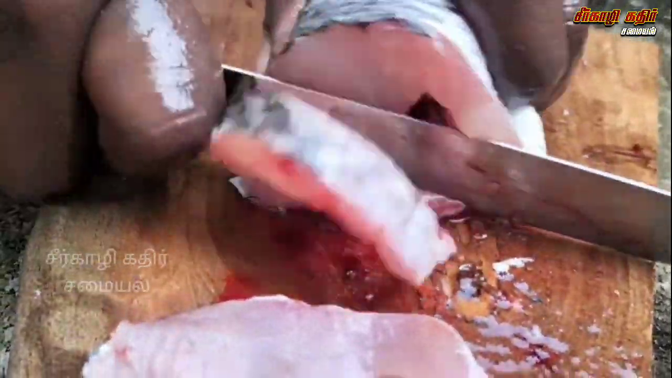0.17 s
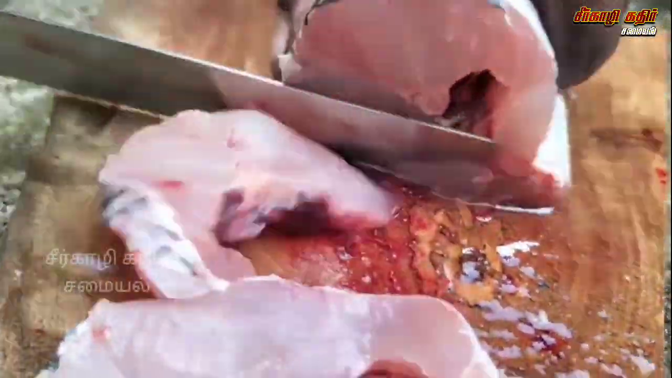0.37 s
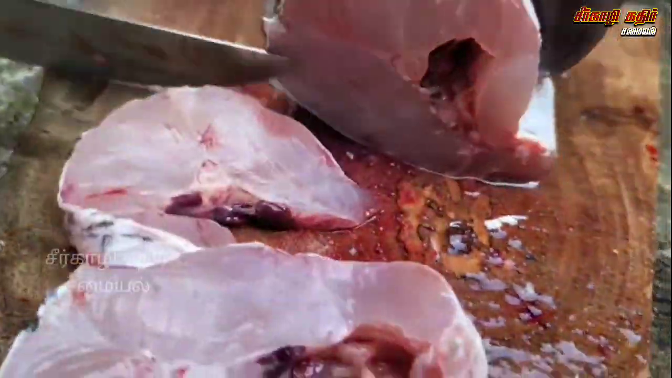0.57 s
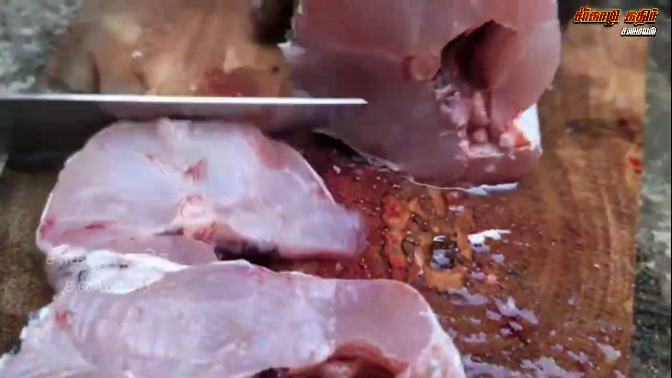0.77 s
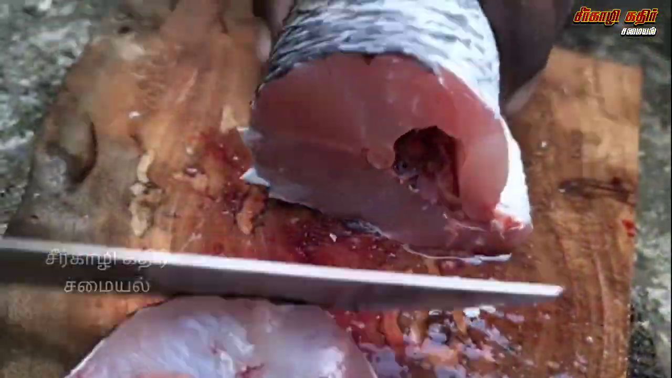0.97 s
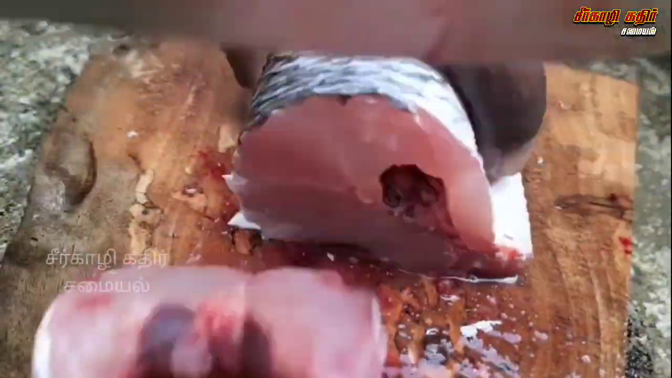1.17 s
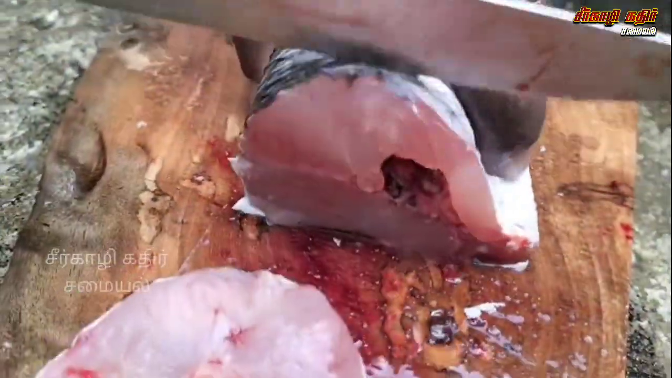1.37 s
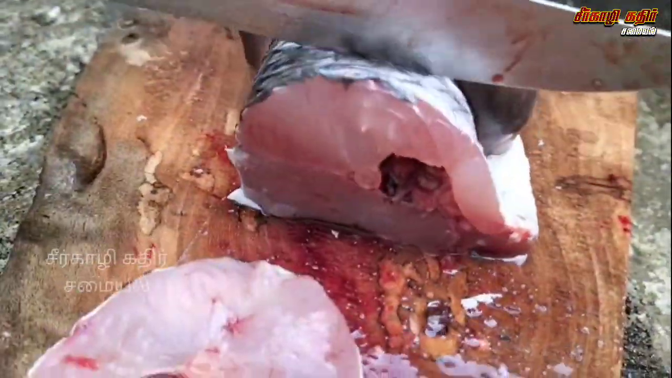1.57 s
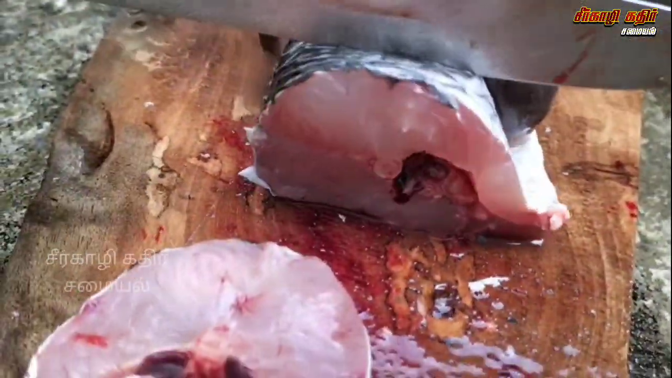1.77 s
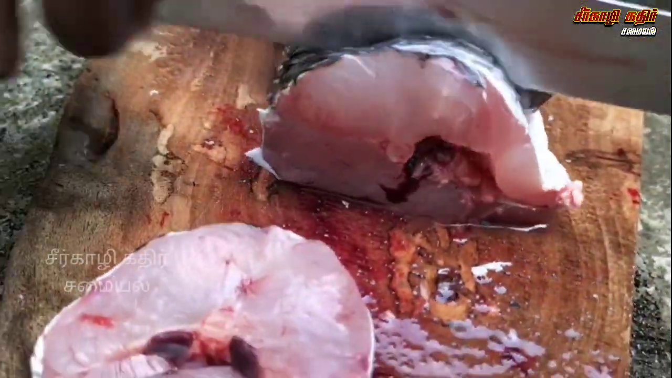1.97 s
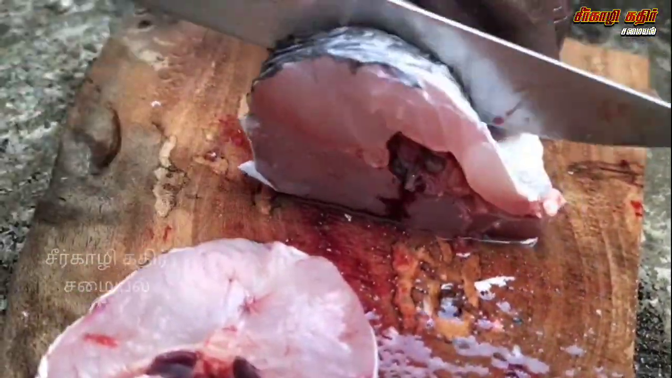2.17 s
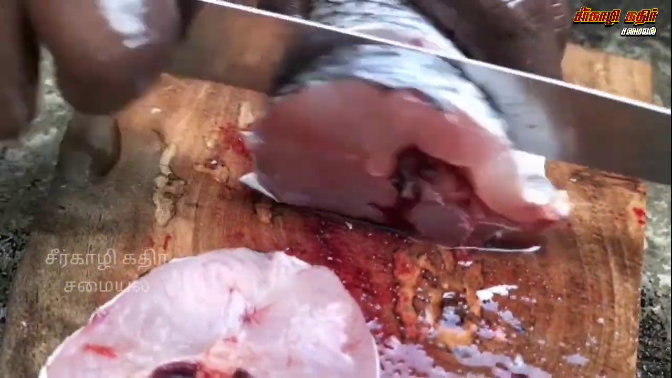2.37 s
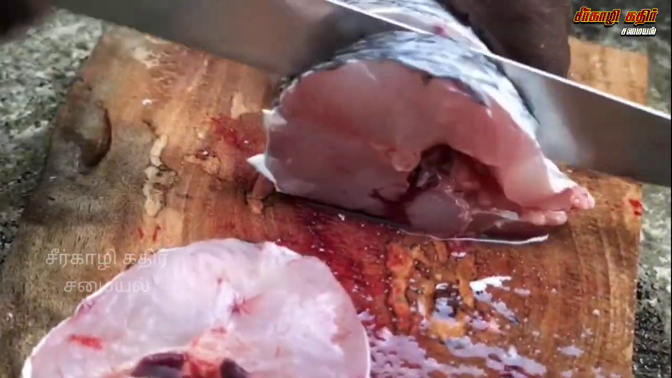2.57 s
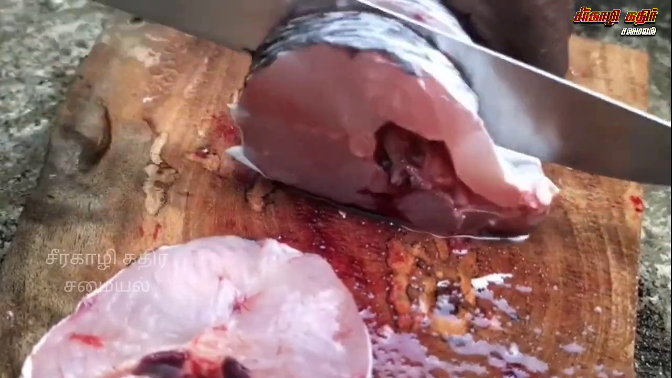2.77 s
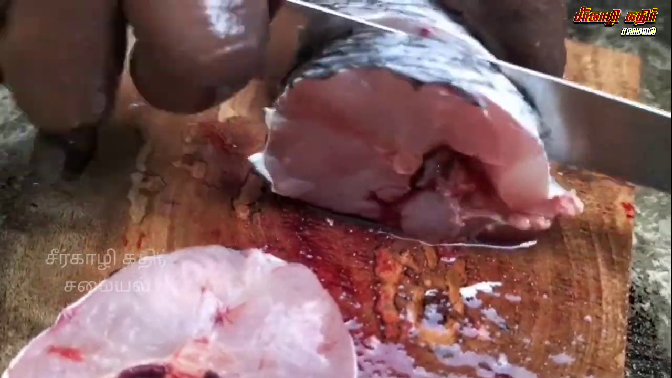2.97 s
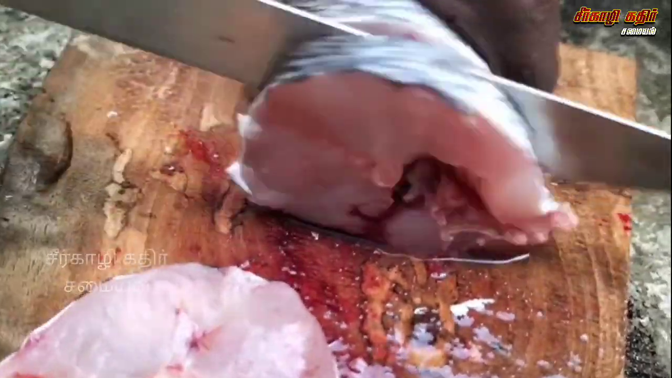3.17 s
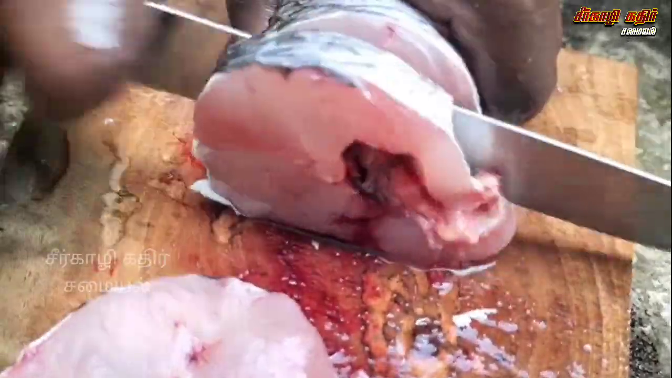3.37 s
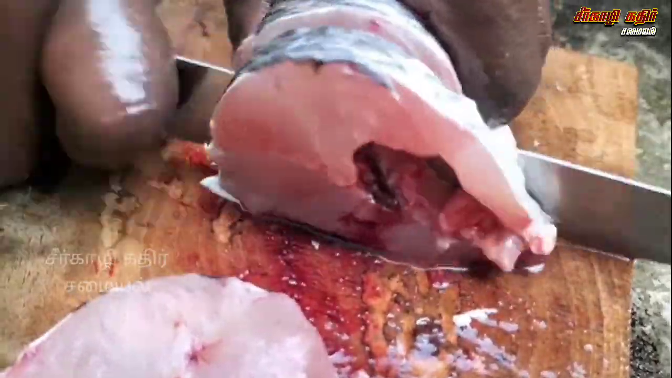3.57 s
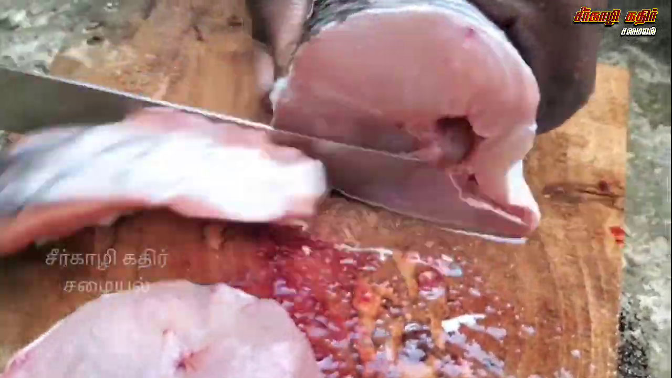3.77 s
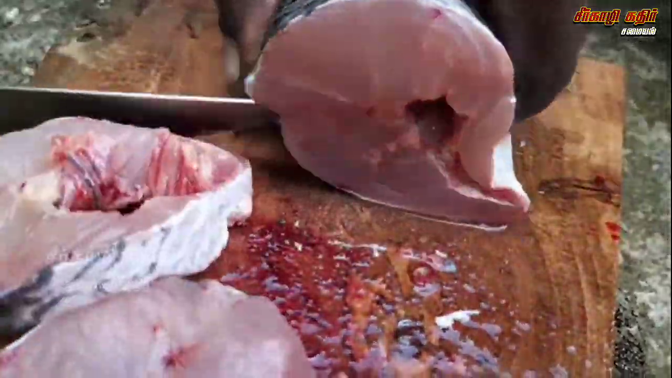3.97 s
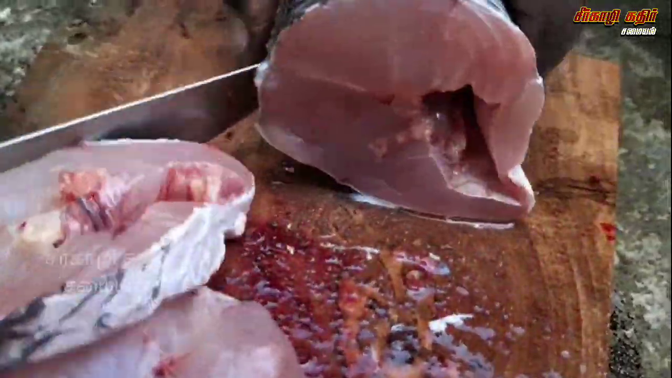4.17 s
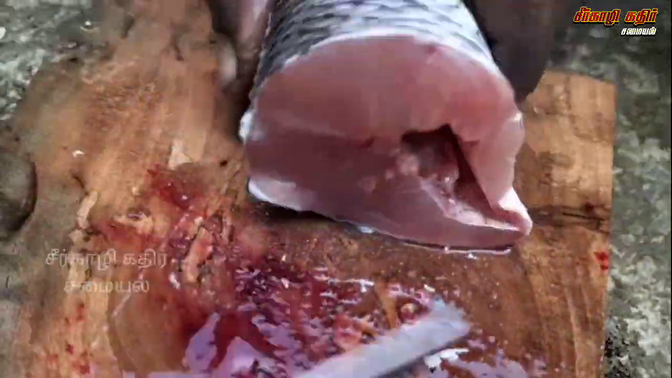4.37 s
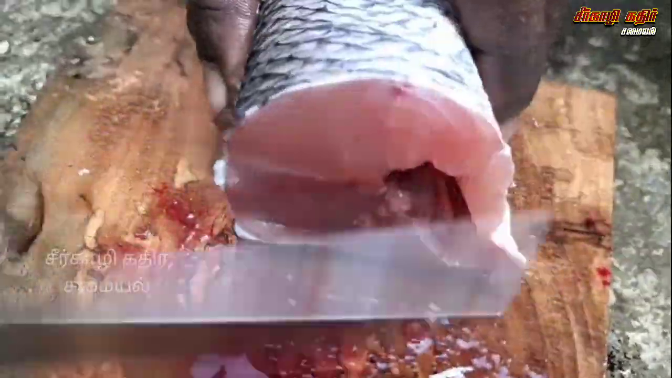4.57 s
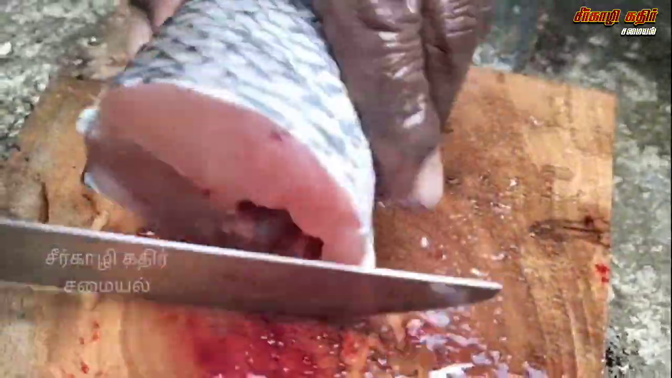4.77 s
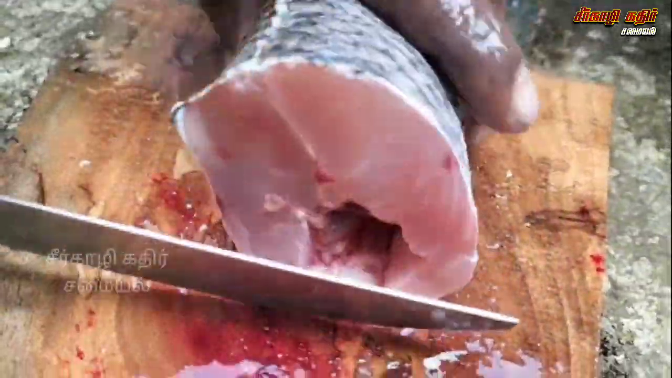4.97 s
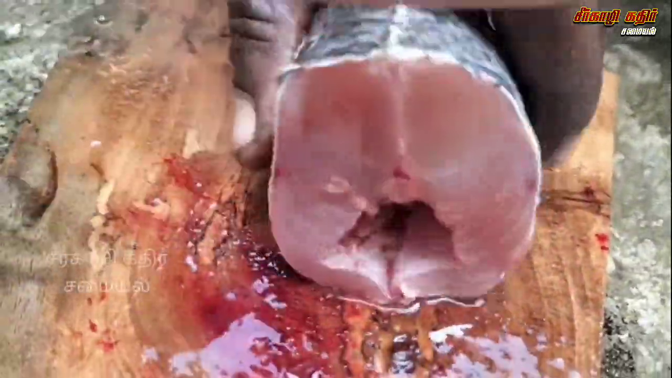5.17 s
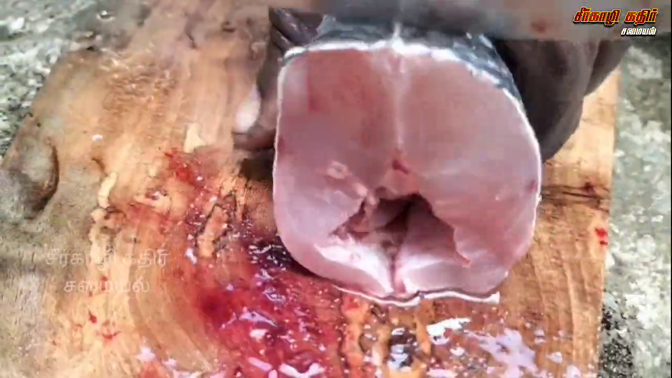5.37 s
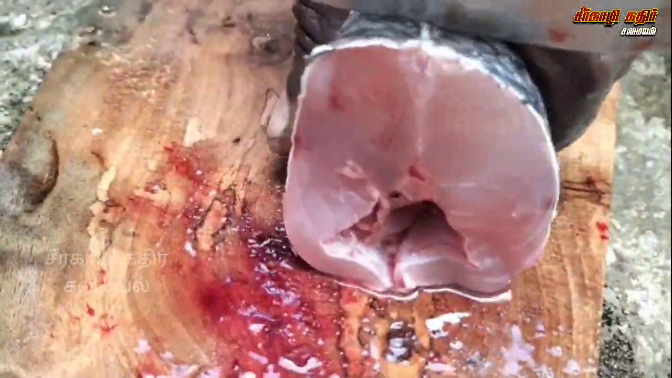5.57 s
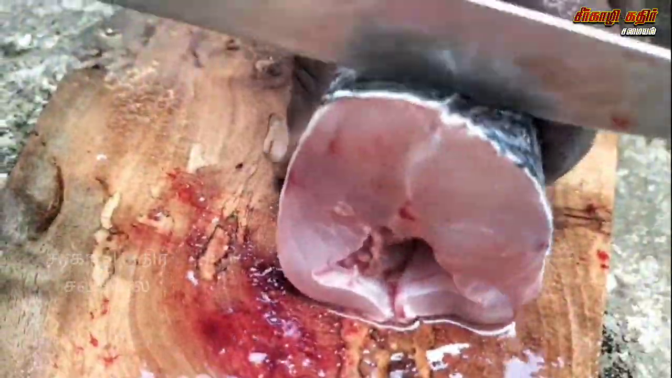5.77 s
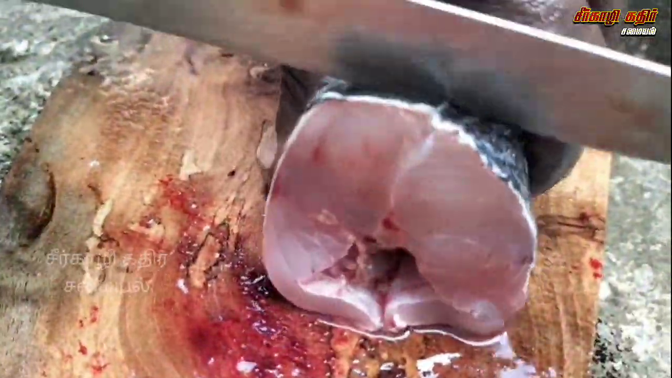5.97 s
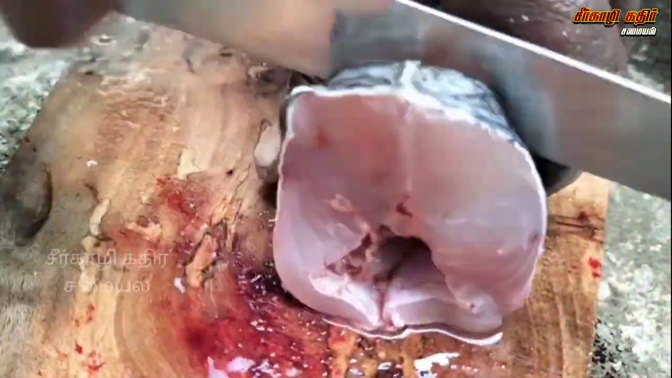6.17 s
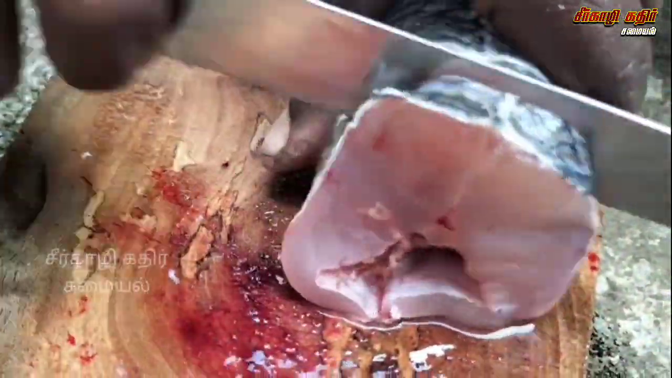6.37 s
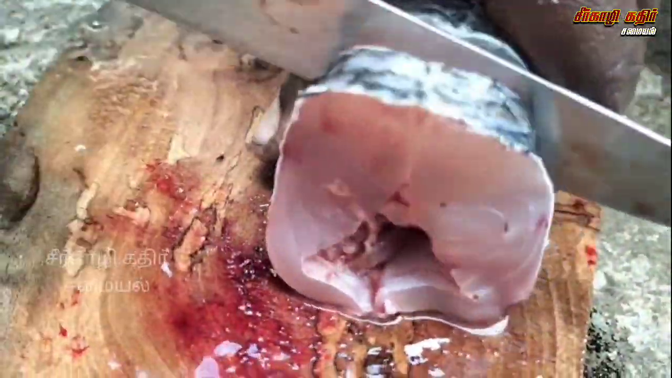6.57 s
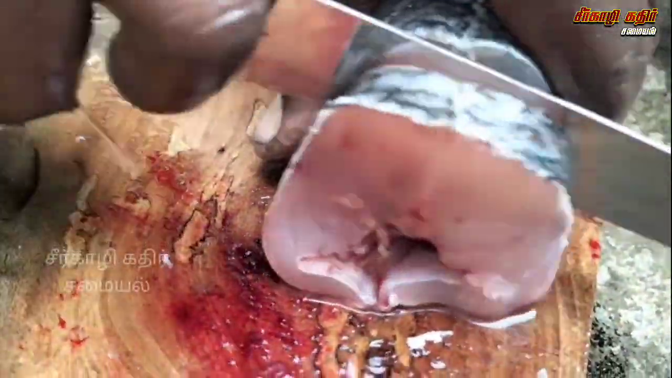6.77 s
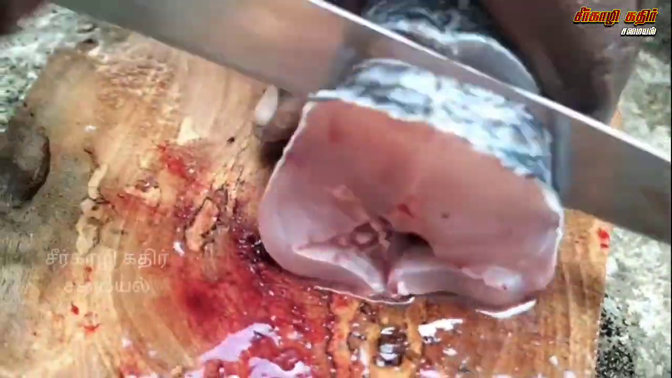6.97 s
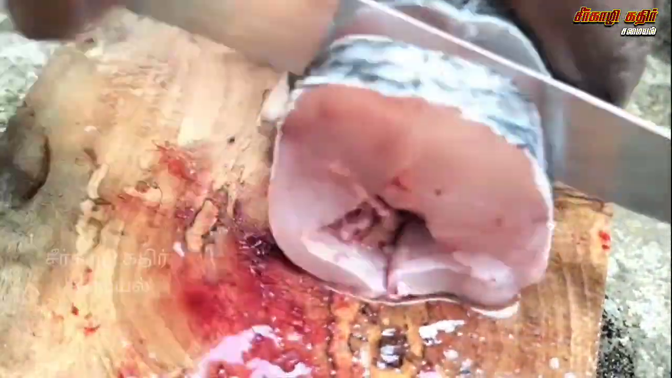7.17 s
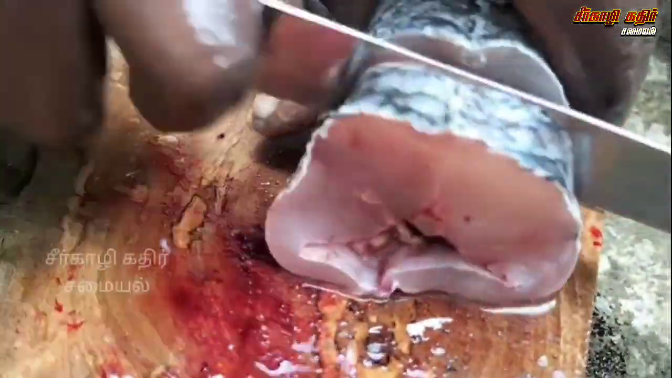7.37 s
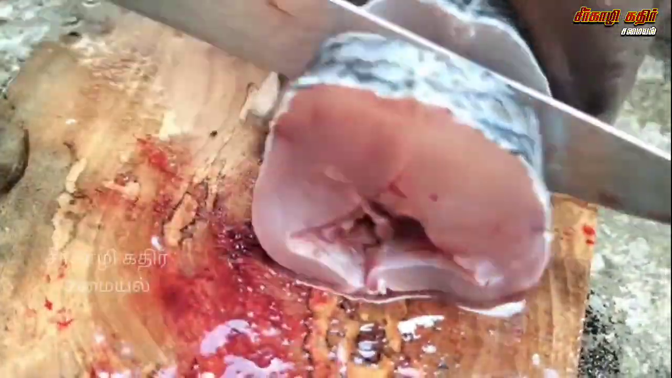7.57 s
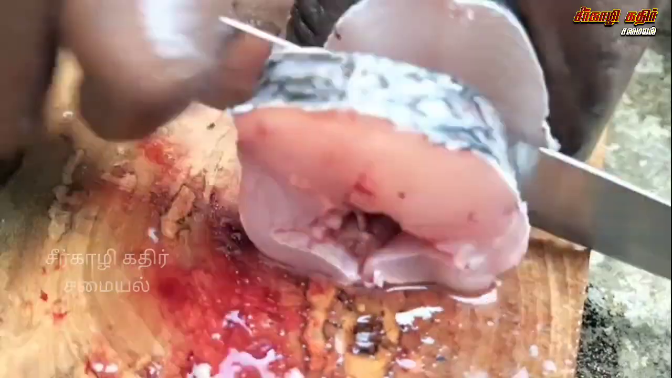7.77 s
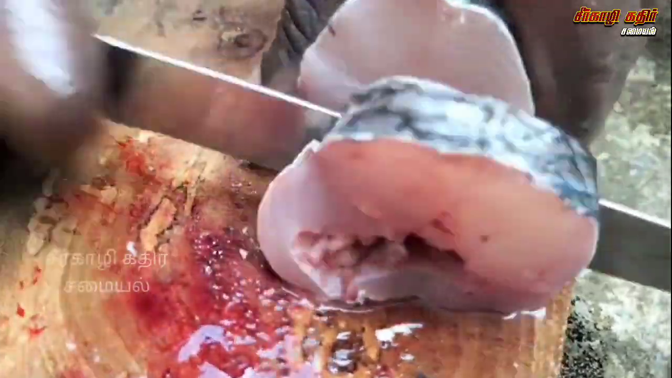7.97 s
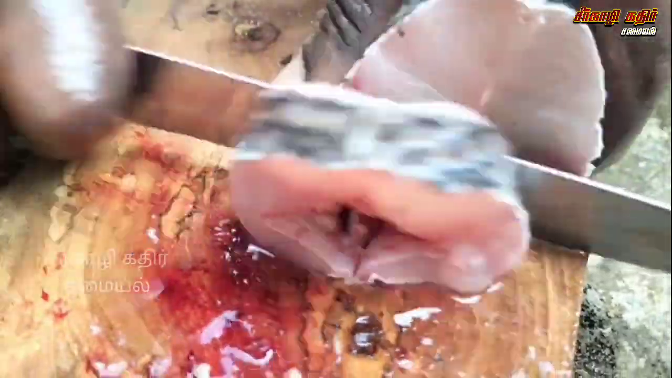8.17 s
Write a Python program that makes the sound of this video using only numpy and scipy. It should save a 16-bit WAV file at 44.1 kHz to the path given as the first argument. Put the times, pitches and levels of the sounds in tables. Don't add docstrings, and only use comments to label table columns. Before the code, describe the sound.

Outdoors, very close: wet slides and cracks on a chopping board, then about a second of faint hum and air. A knife saws in short back-and-forth rasps, growing harsher as bone cracks, while an insect buzzes faintly. Slippery squeaks and dull pushes lead to one sharp wooden knock with a short echo, then a duller tap. Quiet returns before hissing, lighter sawing resumes to the end.

```python
import sys
import numpy as np
from scipy import signal
from scipy.fft import rfft, irfft
from scipy.io import wavfile
from scipy.ndimage import uniform_filter1d, map_coordinates

SR = 44100
rng = np.random.default_rng(int(sys.argv[2]) if len(sys.argv) > 2 else 0)


def log_audio(samples):
    frames = np.atleast_2d(samples).T
    limited = np.clip(frames, -1, 1)
    pcm = np.round(limited * 32767).astype(np.int16)
    wavfile.write(sys.argv[1], SR, pcm)


def to_linear_factor(level_db):
    exponent = np.asarray(level_db, float) / 20
    return 10 ** exponent


N = 362042
T = np.arange(N) / SR

# (time [s], length [s], edge hiss [dB], flesh rasp [dB], scale rasp [dB])
SAW_FIRST = [(2.025, 0.12, -58.5, -65.5, -71), (2.191, 0.12, -65.5, -61, -68.5),
             (2.347, 0.09, -57.5, -50.5, -62.5), (2.517, 0.093, -56.5, -53, -62),
             (2.667, 0.1, -56.5, -48.5, -67.5), (2.845, 0.089, -65.5, -51.5, -57),
             (2.987, 0.088, -56.5, -51.5, -60), (3.15, 0.092, -56.5, -53, -59)]
SAW_LAST = [ (6.135, 0.076, -56.5, -64, -64), (6.292, 0.103, -63.5, -82.5, -81),
            (6.451, 0.1, -66, -64, -67), (6.625, 0.08, -57, -68, -75), (6.775, 0.11, -60.5, -57, -67),
            (6.957, 0.088, -53.5, -56, -71.5), (7.104, 0.11, -58.5, -57, -63),
            (7.283, 0.08, -49, -59, -66.5), (7.425, 0.11, -54, -57.5, -64.5),
            (7.61, 0.083, -50.5, -59.5, -68), (7.764, 0.089, -51.5, -50.5, -54.5),
            (7.899, 0.12, -63, -59, -57), (8.071, 0.098, -59.5, -59, -60)]
SAW_BONE = [
    (3.295, 0.13, -51, -48, -60),
    (3.46, 0.13, -51.5, -56.5, -64),
    (3.615, 0.084, -52, -48, -56.5),
]
SAW_THROUGH = [
    (3.74, .06, -66, -60, -66),
    (3.79, .115, -47, -45, -51),
    (3.9, 0.07, -68.5, -61, -69),
]
BRUSHES = [
    (4.605, .02, -84, -95, -95),
    (4.83, 0.028, -76, -93, -95),
    (4.905, 0.045, -66.5, -68, -80),
    (6.02, 0.12, -80, -78.5, -89),
]
DULL_FIRST_DB = [.2, -3, .1, -2, 3, .1, .1, -1.5]
DULL_LAST_DB = [.1, .1, .1, 3, -2, 3, -2, .1, .1, .1, .1, .1, .1]

# (time [s], hold [s], edge glide [dB], flesh drag [dB], weight on board [dB])
SHOVE_FIRST = [
    (0, 0.024, -55.5, -48.5, -48.5),
    (.125, .035, -60, -53, -62),
    (.18, 0.021, -51, -38.5, -43.5),
    (.39, 0.057, -54, -39.5, -52),
    (.45, .07, -59, -41, -58),
    (.52, 0.041, -62, -48, -55.5),
]
SHOVE_SECOND = [
    (4.18, .02, -70, -58, -66),
    (4.22, 0.055, -60.5, -50, -56),
    (4.26, 0.05, -62, -55, -51),
    (4.36, 0.027, -66, -60, -50),
    (4.45, .02, -67, -64, -48),
    (4.485, 0.061, -60.5, -61.5, -49),
]
SLIDE = [
    (.575, 0.039, -65, -55, -49),
    (.63, 0.078, -75.5, -52, -52),
    (.71, 0.13, -79, -57.5, -51.5),
]
SCRAPE = [
    (.885, .02, -54, -43, -50),
    (.92, 0.057, -63.5, -57.5, -58.5),
    (1.0, 0.055, -73.5, -71, -74),
]

# (low edge [Hz], high edge [Hz])
RASP_BANDS_HZ = [(7300, 16000), (1100, 3300), (3300, 7300), (350, 1100)]
# (frequency [Hz], density [dB per Hz])
COLOUR_SAW_FIRST = [(897, -17), (1600, -0.5), (2200, -12), (3480, -22), (6920, -42), (8380, -15.5),
                    (10500, -16), (15900, -45)]
COLOUR_SAW_LAST = [(500, 4.5), (897, -8.5), (1750, 8), (2500, -18), (6810, -41.5), (8250, -12.5),
                   (10600, -8.5), (15900, -25)]
COLOUR_BONE = [(210, -41.5), (350, -15), (1670, -16), (2230, -14), (3660, -4), (6600, -21.5),
               (10500, -13.5), (15900, -38)]
COLOUR_SHOVE_FIRST = [(300, -24.5), (547, -6), (1450, -12.5), (2380, -6.5), (4640, -19), (8000, -11),
                      (9500, -26), (15900, -21)]
COLOUR_SHOVE_SECOND = [(400, -5), (700, -25), (2400, -23), (3300, -12.5), (4300, -11), (4700, -30),
                       (11200, -18), (15900, -62)]
# (frequency [Hz], width [Hz], level [dB])
RINGS_SAW_FIRST = [(1750, 77, -21), (2670, 170, 3)]
RINGS_SAW_LAST = [(1490, 235, 8.5), (2595, 35, 2.5), (3870, 100, -12.5), (10870, 110, -4)]
RINGS_BONE = [(1730, 220, -4.5), (2600, 91, -2.5), (3730, 243, -14), (8590, 165.3, -9)]
RINGS_SHOVE_FIRST = [(1215, 55, -7), (1782, 56, -1), (2350, 83, -5.5), (5400, 700, -10), (6500, 700, -10)]
RINGS_SHOVE_SECOND = [(655, 110, -2.5), (1210, 96, -16.5)]
RINGS_SLIDE = [(958, 55, -8), (1870, 57, -4.5), (2394, 81, -5.5), (3430, 93, -20), (4740, 580, -15.5)]
RINGS_SCRAPE = [(880, 480, 9), (3840, 380, -7), (8260, 540, -16)]

# (time [s], peak [dB], ring [Hz], bright tick [dB])
SNAPS = [(0.0298, -31, 6500, -50), (.1266, -37, 2930, -45), (.1341, -36, 2610, -60),
         (0.1635, -20, 2340, -40), (.164, -30, 5400, -50), (.192, -30, 5600, -40), (.368, -35, 1750, -60),
         (0.184, -31, 820, -33), (0.197, -29, 1750, -38), (0.415, -26, 1810, -45), (0.586, -32, 756, -60),
         (1.143, -44, 1530, -41), (1.173, -52, 3500, -63), (2.072, -43.5, 2620, -33.5),
         (2.103, -49.5, 1630, -36), (2.259, -44, 2630, -60), (2.268, -42, 3100, -60),
         (2.373, -38, 2600, -42), (2.428, -45, 1640, -60), (2.524, -45, 2600, -60), (2.535, -44, 1700, -60),
         (2.566, -45, 2660, -60), (2.693, -45, 1630, -60), (2.7265, -45, 1520, -60),
         (2.8986, -44, 2670, -60), (3.016, -45, 2660, -60), (3.028, -45, 2680, -60), (3.2, -45, 2670, -60),
         (3.302, -42, 1440, -60), (2.849, -40, 2700, -42), (2.869, -46, 2600, -58), (3.159, -41, 2730, -60),
         (3.33, -29, 2870, -29), (3.34, -31, 2900, -32), (3.375, -26, 3060, -25), (3.3755, -40, 600, -60),
         (3.519, -42, 1740, -42), (3.409, -45.5, 1790, -37), (3.622, -44, 2680, -42),
         (3.652, -31, 1740, -38), (3.6525, -40, 500, -70), (3.815, -38, 2610, -50), (4.236, -35, 810, -60),
         (4.237, -37, 1700, -60), (4.259, -37, 800, -60), (4.266, -38, 1500, -60), (4.441, -37, 608, -60),
         (4.451, -38, 640, -60),
         (5.053, -57, 655, -93.5), (5.609, -48, 2850, -75), (5.944, -47, 2850, -88),
              (6.168, -47, 1730, -41.5), (6.503, -38, 1730, -31.5), (6.533, -46.5, 2860, -57),
              (6.822, -34, 1320, -31), (6.6473, -48, 1730, -60), (6.654, -46, 1510, -60),
              (6.666, -46, 1600, -60), (6.962, -48, 1800, -56), (6.982, -49, 1570, -60),
              (7.297, -49, 1790, -60), (7.458, -48, 1440, -60), (7.486, -45, 1430, -60),
              (7.773, -42, 1710, -50), (7.922, -41, 3790, -55), (8.0915, -47, 1610, -60),
              (7.1, -47.5, 2860, -71), (7.189, -41, 3710, -38.5), (7.285, -51, 1826, -41),
              (7.618, -51.5, 1730, -31), (7.794, -37, 1698, -27), (7.806, -35, 1860, -38),
              (7.827, -35.5, 3970, -33), (7.881, -51, 4800, -48), (7.889, -52, 4800, -48),
              (8.064, -55, 5190, -63), (8.141, -45, 1570, -55), (8.142, -46, 4800, -60)]
# (time [s], peak [dB])
TICKS = [(0.325, -53), (0.118, -47), (1.2444, -60), (1.3349, -68), (2.4713, -56), (2.6716, -45),
         (2.8203, -47), (3.1358, -51), (3.2444, -61), (3.2695, -57), (3.299, -57), (4.1483, -47.5),
         (4.398, -51), (4.4533, -43), (4.888, -72), (4.937, -56), (5.1372, -69), (6.113, -57.5),
         (6.141, -49), (6.6, -49.5), (6.7543, -46), (7.2456, -52), (7.4036, -60), (7.444, -37.5),
         (7.5344, -57), (7.5467, -52), (7.5842, -59)]

# (time [s], peak [dB], yard echo [dB], low thud [dB], echo reach [share])
KNOCKS = [
    (4.7163, -38, -70.5, 5, 0.1),
    (4.7185, -8.2, -29.5, -0.5, 1.02),
    (4.9079, -24.5, -51.5, 17, 0.42),
]
# (frequency [Hz], level [dB], T60 [s])
KNOCK_MODES = [(600, -16.5, 0.065), (1400, -5, 0.0056), (2060, -1, 0.0076), (2645, -6, 0.0098),
               (3707, 4.5, 0.008), (5600, -21, 0.011), (8000, -24, .006)]
# (frequency [Hz], level [dB])
ECHO_COLOUR = [(250, -14), (450, -8.5), (600, -5.5), (1000, -10), (3700, -6), (5000, -13), (13000, -42),
               (14500, -70)]
# (frequency [Hz], T60 [s])
ECHO_T60_S = [(300, .4), (800, 0.21), (2000, .21), (4000, 0.21), (9000, 0.16)]

# (time [s], length [s], frequency [Hz], level [dB], width [Hz])
NOTES = [(0.865, 0.06, 4100, -48.5, 420), (0.927, 0.15, 3700, -60.5, 150), (4.2, .145, 3800, -45.5, 330),
         (4.344, 0.057, 3600, -50.5, 440), (4.47, 0.075, 640, -47.5, 175), (4.315, .025, 620, -44, 120),
         (4.415, .04, 2900, -63, 400), (.185, .045, 1170, -42, 60), (.43, .09, 2350, -45, 250),
         (.46, .02, 1740, -42, 80), (7.93, .03, 640, -52, 150), (8.1, .08, 600, -62, 300),
         (3.85, .03, 850, -54, 150), (2.185, .07, 2680, -60, 150), (6.84, .04, 2750, -58, 200),
         (0, .9, 178, -62, 3), (1.75, 1.3, 84, -72, 3), (2.3, .3, 152, -66, 5), (1.75, .4, 275, -70, 5),
         (3.82, .09, 3700, -49, 600), (3.9, .1, 3900, -61, 200), (4.478, 0.067, 5920, -56.5, 400),
         (2.031, 0.06, 5450, -60.5, 400), (2.245, .052, 2400, -51, 900), (2.245, .052, 1500, -55, 500),
         (6.568, 0.019, 4140, -69, 15), (6.605, 0.034, 4180, -72, 15), (7.365, 0.063, 3880, -66.5, 20),
         (4.485, .075, 3000, -52, 700), (7.645, 0.19, 1173, -67, 12), (6.725, 0.073, 220.3, -47, 8.2),
         (6.73, .06, 284, -53.5, 60), (6.782, 0.086, 217.4, -49, 37), (6.89, 0.055, 214, -56.5, 26),
         (6.496, 0.039, 660, -54.5, 160), (6.626, 0.068, 1580, -55.5, 530), (7.5, 0.038, 284, -52, 32),
         (7.92, 0.047, 630, -54.5, 180), (1.69, .06, 1060, -70, 46), (1.79, .07, 1090, -70, 46),
         (.885, .035, 1000, -47, 300)]
# (time [s], length [s], start [Hz], level [dB])
WHISTLES = [
    (0.952, 0.26, 7000, -63),
    (2.93, 0.3, 6800, -69),
    (4.345, .365, 6680, -63),
    (6.955, 0.34, 6660, -61),
]
# (time [s], length [s], level [dB], fade [dB])
BUZZES = [
    (2.125, 0.73, -57.5, -2.5),
    (3.7, 0.58, -57, -20),
]
# (frequency [Hz], width [Hz], level [dB])
WING_RINGS = [(3920, 110, -8), (4040, 110, -8), (4450, 250, -12), (4860, 110, -6), (5020, 110, -6)]

# (frequency [Hz], density [dB per Hz])
YARD_COLOUR = [(22, -24), (64, -14), (95, -5.5), (262, -5), (420, -11.5), (1200, -23), (6300, -38.5),
               (7300, -48), (15900, -58)]
# (time [s], level [dB], brightness [dB])
YARD_LEVEL = [(0.0, -53.5, -12.5), (0.5, -53, -22.5), (.88, -56, -5), (0.92, -62, 9.5), (1.58, -63.5, 6),
              (3.75, -61.5, 11), (4.11, -64, 9), (4.459, -63.5, 10.5), (5.56, -72.5, 10.5),
              (6.97, -70, 11.5), (8.21, -74, 17.5)]
# (frequency [Hz], width [Hz], level [dB])
MOTOR_HUMS = [(88.9, 9.1, -10), (156, 13, -6), (186, 11, -10), (280.7, 22, -5.5)]

PUSH_CREST, PULL_CREST = 0.63, 0.38
WING_BEATS_HZ = 126.6
WHISTLE_TOP_HZ, WHISTLE_FADE_DB = 7800, -9.5


def evened(x):
    return x / np.sqrt(np.mean(x ** 2) + 1e-20)


def read(points, hz):
    f, value = np.transpose(points)
    return np.interp(np.log(hz + 1), np.log(f + 1), value)


def add(mix, start_s, sound):
    part = mix[round(start_s * SR):][:len(sound)]
    part += sound[:len(part)]


def resonate(x, hz, width_hz):
    turn = np.exp(2j * np.pi * np.cumsum(hz * np.ones(len(x))) / SR)
    r = np.exp(-np.pi * width_hz / SR)
    return 2 * (turn * signal.lfilter([1 - r], [1, -r], x / turn + 1e-18)).real


def patchy(n, colour, patchy_db):
    frames = n // 128 + 5
    hz = np.fft.rfftfreq(512, 1 / SR)
    a, b, patches = rng.standard_normal((frames, 257, 3)).T
    patches = uniform_filter1d(patches, size=3, axis=0)
    patches = evened(uniform_filter1d(patches, size=14, axis=1))
    level_db = read(colour, hz)[:, None] + patchy_db * patches
    return (a + 1j * b) * to_linear_factor(level_db), hz, np.arange(frames) * 128 / SR


def unframe(z, n):
    return signal.istft(z, nperseg=512, noverlap=384)[1][:n]


def rasp(levels, colour, rings, grain_db, ring_db):
    n = levels.shape[1]
    lumps = evened(uniform_filter1d(rng.standard_normal(n), size=60))
    grains = unframe(patchy(n, [(100, 0), (20000, 0)], patchy_db=3.3)[0], n) * to_linear_factor(grain_db * lumps)
    scale_slips = rng.standard_normal(n) * (rng.random(n) < 200 / SR)
    slips = evened(grains) + 2.5 * scale_slips

    hz = np.fft.rfftfreq(n, 1 / SR)
    ringing = sum(to_linear_factor(db + ring_db) / (1 + 2j * (hz - f) / w) for f, w, db in rings)
    z = rfft(slips) * np.hypot(to_linear_factor(read(colour, hz)), abs(ringing))

    def lowpass(f):
        return 1 / np.sqrt(1 + (hz / f) ** 16)

    bands = []
    for low_hz, high_hz in RASP_BANDS_HZ:
        window = lowpass(high_hz) * np.sqrt(1 - lowpass(low_hz) ** 2)
        bands.append(evened(irfft(z * window, n)))
    bands.append(irfft(rfft(bands[1]) * lowpass(2100), n))

    wander = uniform_filter1d(rng.standard_normal(n), size=2500)
    drift = 1 + 0.025 * evened(uniform_filter1d(wander, size=2500))
    place = np.cumsum(drift) % (n - 1)
    return sum(g * map_coordinates(b, [place], order=3) for g, b in zip(levels, bands))


def hump(u, crest, sharp_db):
    edges = 1 / (1 + np.exp(-u / 0.034)) / (1 + np.exp((u - 1) / 0.087))
    return edges * to_linear_factor(-sharp_db * (u - np.clip(crest, 0, 1)) ** 2)


def sawing(strokes, colour, rings, board_db, dull_db=np.zeros(9)):
    start_s = strokes[0][0] - 0.1
    t = T[round(start_s * SR):round((strokes[-1][0] + 0.3) * SR)]
    levels = np.zeros((5, len(t)))
    for k, (s, length_s, hiss_db, flesh_db, scale_db) in enumerate(strokes):
        u = np.clip((t - s) / length_s, -3, 4)
        crest = (PUSH_CREST, PULL_CREST)[k % 2]
        heavy = hump(u, crest, sharp_db=21.5)
        flesh = to_linear_factor(flesh_db - 2.5) * heavy
        levels += [to_linear_factor(hiss_db - 2.5) * hump(u, 0.41, sharp_db=17.6),
                   flesh,
                   to_linear_factor(scale_db + 6.0) * hump(u, crest, sharp_db=27.4),
                   to_linear_factor(flesh_db + board_db) * heavy,
                   flesh * (to_linear_factor(dull_db[k]) - 1)]
    return start_s, rasp(levels, colour, rings, grain_db=1.5, ring_db=1.5)


def shoving(pushes, colour, rings, ring_db, scale_db, rise_db_per_s, fall_db_per_s):
    s, hold_s, glide_db, flesh_db, board_db = np.transpose(pushes)[..., None]
    start_s = max(s.min() - 0.1, 0)
    t = T[round(start_s * SR):round((s.max() + 0.3) * SR)]
    rise_db = -rise_db_per_s * np.maximum(s - t, 0)
    push_db = rise_db - fall_db_per_s * np.maximum(t - s - hold_s, 0)
    bands_db = (glide_db, flesh_db, glide_db + scale_db, board_db)
    levels = [to_linear_factor((push_db + db).max(0)) for db in bands_db] + [0 * t]
    levels = uniform_filter1d(np.array(levels), size=300)
    return start_s, rasp(levels, colour, rings, grain_db=1.5, ring_db=ring_db)


def snap(peak_db, hz, tick_db):
    t = T[:1500]
    rise = 1 - np.exp(-(t / 0.00057) ** 2)
    spread = resonate(rng.standard_normal(1500), hz, 0.7 * hz)
    spread = evened(resonate(spread, hz, 0.9 * hz))
    decay = to_linear_factor(peak_db - 60 * t / (0.011 + 14 / hz))
    ring = (np.sin(2 * np.pi * hz * t) + 0.56 * spread) * rise * decay
    highpass = signal.butter(2, 400, "highpass", fs=SR, output="sos")
    return signal.sosfilt(highpass, ring) + tick(tick_db)


def tick(db):
    t = T[:1500]
    decay = to_linear_factor(db - 4 - 60 * t / 0.026) + to_linear_factor(db - 4.5 - 60 * t / 0.005)
    puff = evened(rng.standard_normal(1500)) * decay
    bandpass = signal.butter(4, [7500, 12300], "bandpass", fs=SR, output="sos")
    return signal.sosfilt(bandpass, puff)


def knock(peak_db, echo_db, thud_db, reach):
    t, n = T[:6000], 22000
    blow = 0
    for hz, db, t60_s in KNOCK_MODES:
        decay = to_linear_factor(db + thud_db * (hz < 1600) - 60 * t / t60_s)
        blow = blow + decay * np.cos(2 * np.pi * hz * (t - 0.0005))
    blow = blow * (1 - np.exp(-(t / 0.00024) ** 2))

    z, hz, frames_s = patchy(n, ECHO_COLOUR, patchy_db=2.2)
    level = np.sqrt(np.mean(unframe(z, n) ** 2))
    t60_s = reach * read(ECHO_T60_S, hz)[:, None]
    tail = unframe(z * to_linear_factor(-60 * frames_s / t60_s), n) / level
    tail = to_linear_factor(echo_db) * tail * (1 - np.exp(-T[:n] / 0.006))
    add(tail, 0, to_linear_factor(peak_db) * blow / abs(blow).max())
    highpass = signal.butter(2, 350, "highpass", fs=SR, output="sos")
    return signal.sosfilt(highpass, tail)


def note(length_s, hz, db, width_hz):
    t = T[:round(length_s * SR)]
    progress = np.arange(-3000, len(t)) / len(t)
    sinking = hz - 0.438 * width_hz * np.clip(progress - 0.5, -0.5, 0.5)
    waver = resonate(rng.standard_normal(len(sinking)), sinking[:1], width_hz)
    waver = evened(resonate(waver, sinking[:1], width_hz))[-len(t):]
    waver = np.interp(np.cumsum(sinking[-len(t):] / sinking[0]), np.arange(len(t)), waver)
    clean = np.exp(-width_hz / 60)
    tone = clean * np.sin(2 * np.pi * hz * t) + (1 - clean) * waver
    return to_linear_factor(db) * tone * np.sqrt(np.sin(np.pi * (t / length_s) ** 0.96))


def whistle(length_s, low_hz, db):
    u = T[:round(length_s * SR)] / length_s
    glide_hz = low_hz + (WHISTLE_TOP_HZ - low_hz) * u
    tone = np.sqrt(2) * np.sin(2 * np.pi * np.cumsum(glide_hz) / SR)
    blur = evened(resonate(rng.standard_normal(len(u)), glide_hz, 110))
    level = to_linear_factor(db + WHISTLE_FADE_DB * u) * signal.windows.tukey(len(u), 0.2)
    return level * (0.27 * tone + 0.31 * blur)


def buzz(length_s, db, fade_db):
    u = T[:round(length_s * SR)] / length_s
    wobble = evened(uniform_filter1d(rng.standard_normal(len(u)), size=900))
    phase = np.cumsum(WING_BEATS_HZ * (1 + 0.19 * wobble)) / SR % 1
    beats = 0.48 + np.exp(-phase / 0.2)
    drive = beats * rng.standard_normal(len(u))
    rings = sum(to_linear_factor(g) * evened(resonate(resonate(drive, f, w), f, 2 * w)) for f, w, g in WING_RINGS)
    return to_linear_factor(db + fade_db * u) * rings * signal.windows.tukey(len(u), 0.15)


def yard():
    s, db, bright_db = np.transpose(YARD_LEVEL)
    hz = np.fft.rfftfreq(N, 1 / SR)
    air = unframe(patchy(N, [(100, 0.022), (20000, 0.00093)], patchy_db=2.5)[0], N)
    z = rfft(air) * to_linear_factor(read(YARD_COLOUR, hz))
    hums = sum(to_linear_factor(g + 10) / abs(1 + 2j * (hz - f) / w) for f, w, g in MOTOR_HUMS)
    z = z * np.hypot(1, hums * (hz < 400))
    high = 1 / (1 + (700 / (hz + 1)) ** 2)
    level = to_linear_factor(np.interp(T, s, db) - 2.5) / np.std(irfft(z, N))
    bright = to_linear_factor(np.interp(T, s, bright_db))
    return level * (irfft(z * (1 - high), N) + bright * irfft(z * high, N))


def scene():
    mix = yard()
    add(mix, *sawing(SAW_FIRST, COLOUR_SAW_FIRST, RINGS_SAW_FIRST, board_db=-16.5, dull_db=DULL_FIRST_DB))
    add(mix, *sawing(SAW_LAST, COLOUR_SAW_LAST, RINGS_SAW_LAST, board_db=-8, dull_db=DULL_LAST_DB))
    add(mix, *sawing(BRUSHES, COLOUR_SAW_LAST, RINGS_SAW_LAST, board_db=-3))
    add(mix, *sawing(SAW_BONE, COLOUR_BONE, RINGS_BONE, board_db=-8.5, dull_db=[0.1, 0.1, 0.1]))
    add(mix, *sawing(SAW_THROUGH, COLOUR_BONE, RINGS_BONE, board_db=-24))
    add(mix, *shoving(SHOVE_FIRST, COLOUR_SHOVE_FIRST, RINGS_SHOVE_FIRST, ring_db=4.0, scale_db=9,
                      rise_db_per_s=335, fall_db_per_s=380))
    add(mix, *shoving(SLIDE, COLOUR_SHOVE_FIRST, RINGS_SLIDE, ring_db=11.5, scale_db=9.5,
                      rise_db_per_s=400, fall_db_per_s=202))
    add(mix, *shoving(SCRAPE, COLOUR_SHOVE_FIRST, RINGS_SCRAPE, ring_db=14, scale_db=3.5,
                      rise_db_per_s=750, fall_db_per_s=265))
    add(mix, *shoving(SHOVE_SECOND, COLOUR_SHOVE_SECOND, RINGS_SHOVE_SECOND, ring_db=16.0, scale_db=0,
                      rise_db_per_s=470, fall_db_per_s=800))
    for source, events in ((snap, SNAPS), (tick, TICKS), (knock, KNOCKS), (note, NOTES),
                           (whistle, WHISTLES), (buzz, BUZZES)):
        for start_s, *settings in events:
            add(mix, start_s, source(*settings))
    return mix[None]


def band_limit(x):
    return signal.sosfilt(signal.butter(12, 16020, fs=SR, output="sos"), x)


def record(dry):
    rolloff = signal.firwin(255, 15800, window=("kaiser", 8), fs=SR)
    rolled = signal.oaconvolve(dry, rolloff[None], "same")
    return band_limit(rolled)


dry = scene()
out = record(dry)
log_audio(out)
```